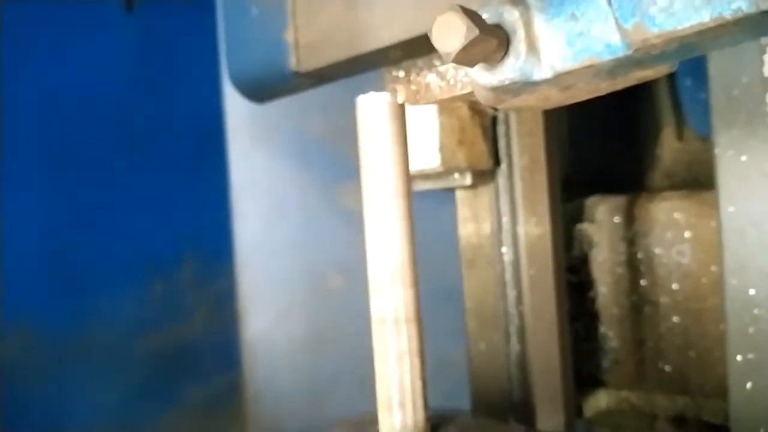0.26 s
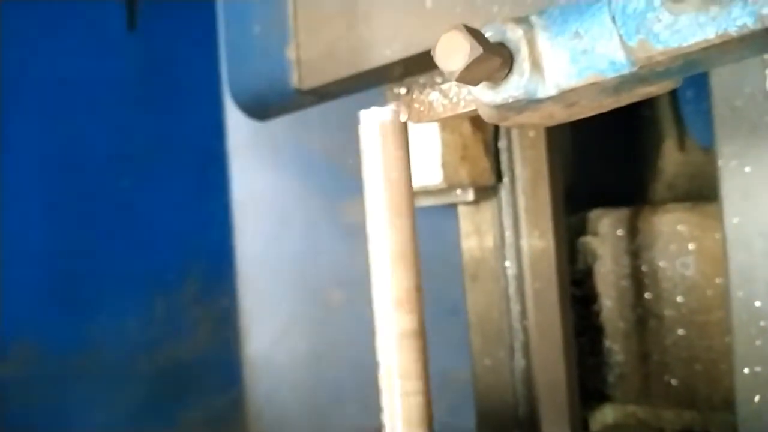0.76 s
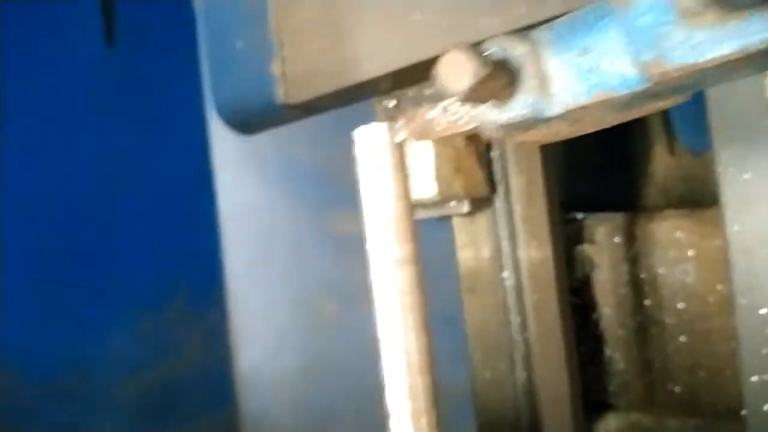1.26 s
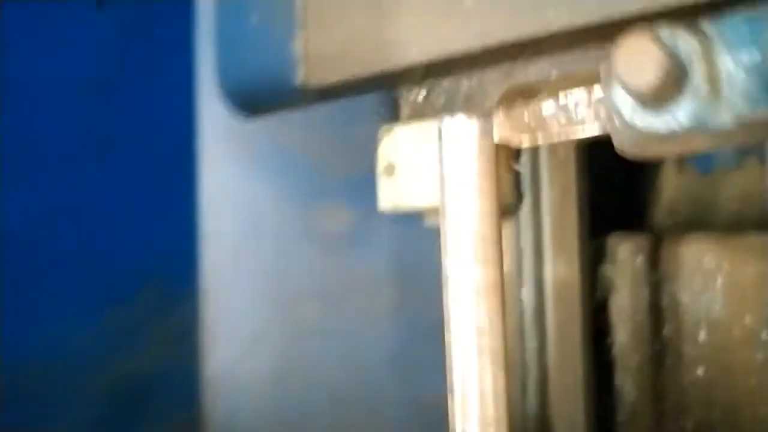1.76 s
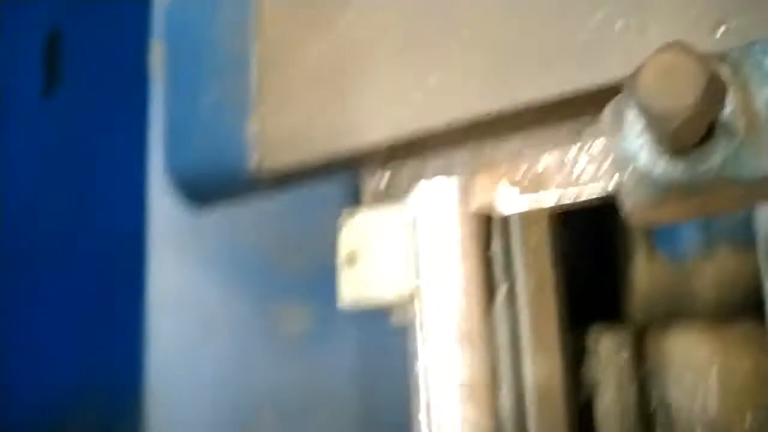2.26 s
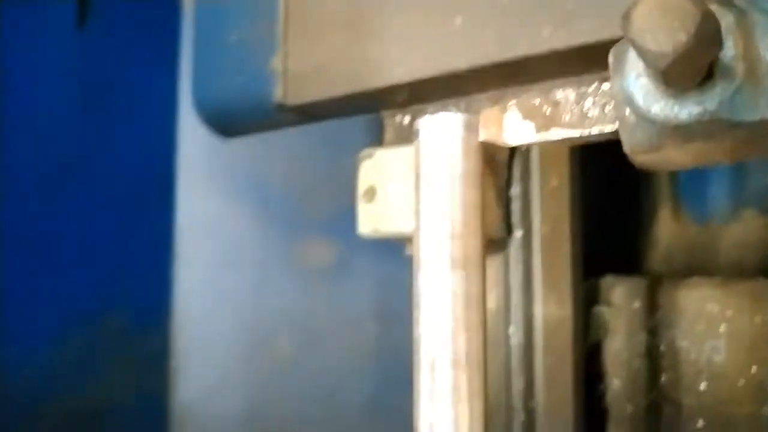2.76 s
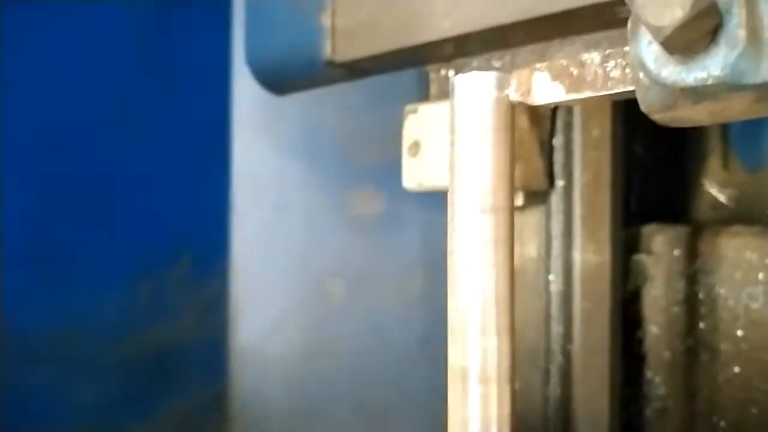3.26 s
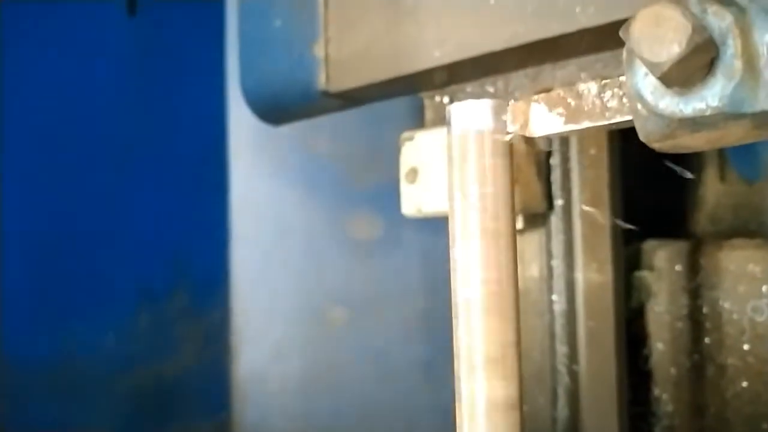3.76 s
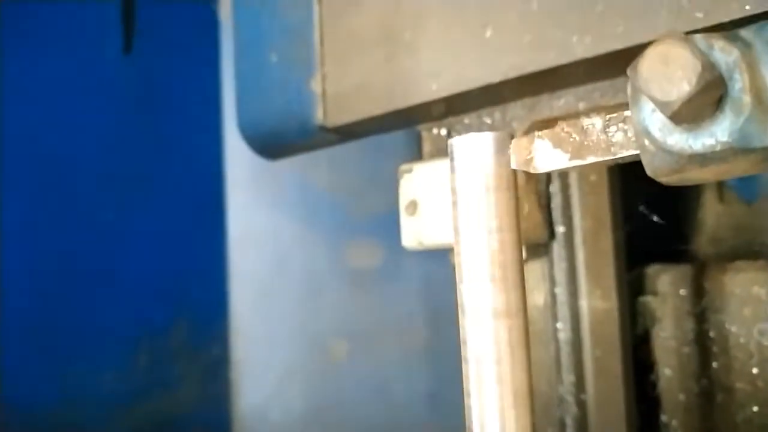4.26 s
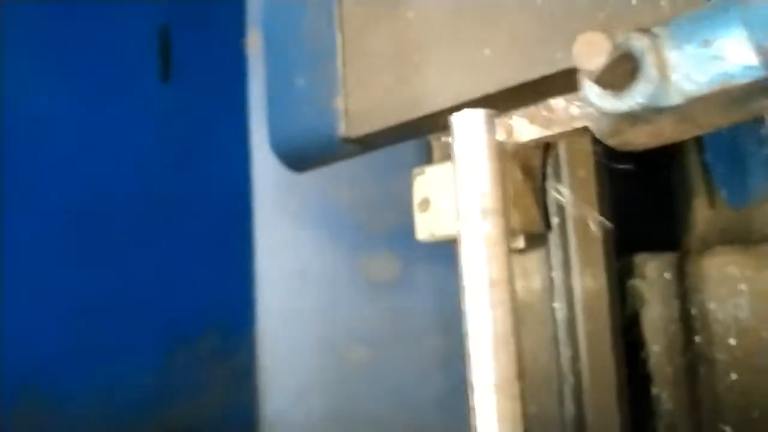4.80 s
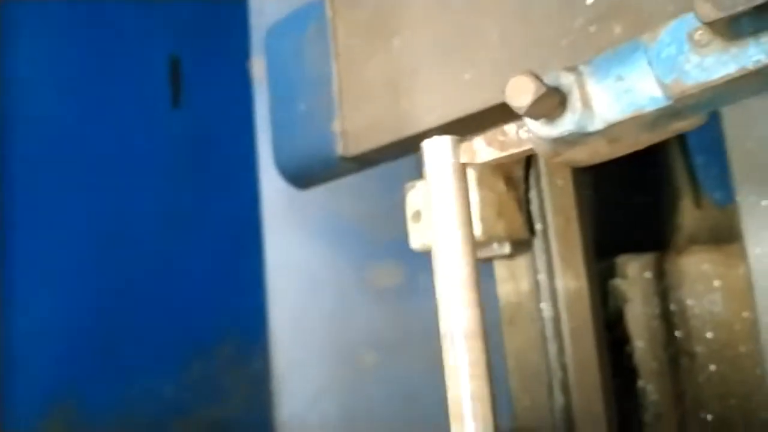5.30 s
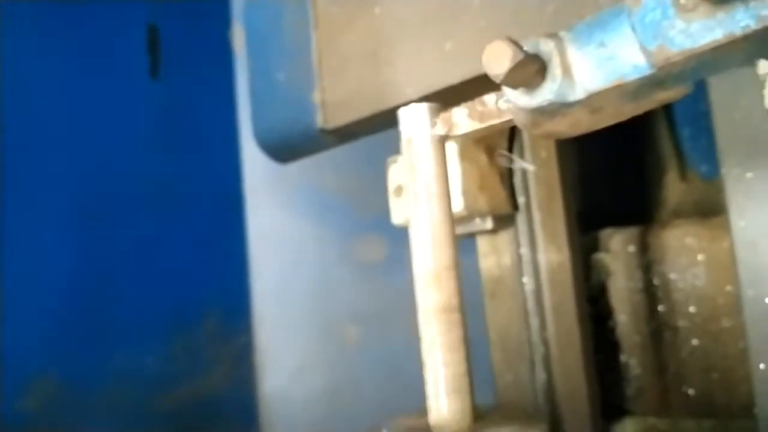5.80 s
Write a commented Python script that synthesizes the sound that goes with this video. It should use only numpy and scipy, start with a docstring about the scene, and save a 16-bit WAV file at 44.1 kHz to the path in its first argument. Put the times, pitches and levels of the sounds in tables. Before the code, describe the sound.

Close to a running lathe in a workshop, a steady motor rumble and gear hum sit beneath the fast, even ringing of a tool striking a turning metal rod. The cut deepens into a piercing, stuttering screech, harsh and slightly distorted at its peak. It then lightens to rhythmic chirps and scrapes, squeals again briefly, and carries on with the same bright, pulsing ring.

```python
"""A lathe tool squeals and rings against a slightly bent metal rod that turns about six times a second.
On light cuts it strikes only the high spots and rings in free decay. On deep cuts it sustains a
self-excited squeal, to which the rod's chatter adds side tones and rasp. Gears and motor hum beneath.
A hand-held two-port microphone hears it all; its limiter and clipping catch the peaks."""
import sys
import numpy as np
from scipy import signal
from scipy.fft import rfft, irfft, next_fast_len
from scipy.io import wavfile
from scipy.ndimage import uniform_filter1d, minimum_filter1d, map_coordinates

SR = 44100
rng = np.random.default_rng(int(sys.argv[2]) if len(sys.argv) > 2 else 0)


def dump(signal):
    """Clip the signal to [-1, 1] and save it as 16-bit WAV at the path in sys.argv[1]."""
    limited = np.clip(np.atleast_2d(signal).T, -1, 1)
    pcm = np.round(limited * 32767).astype(np.int16)
    wavfile.write(sys.argv[1], SR, pcm)


N = 266364
MESH_HZ = 665  # rate at which the gears shake the cut

# Resonances of the tool. Each row: frequency in Hz, bandwidth in Hz, relative gain in dB.
TOOL_MODES = [(4630, 120, -1.5), (5490, 205, 12), (6128, 102, 9), (6107, 400, 12.5), (8400, 330, -15)]
# Light contact of tool and rod. Each row: time in seconds, scrape level in dB,
# left-right difference of the bites in dB, their roughness from 0 to 1.
CONTACT = [(0, -50.5, -0.5, 0.53), (1, -39.5, 2.5, 0.51), (2.8, -31, 6, 0.53), (3.5, -35.5, 9, 0.69),
           (4.3, -38, 9.5, 0.66), (4.6, -44.5, 6.5, 0.28), (5, -33, 3, 0.42), (5.4, -41.5, 2, 0.38),
           (6.04, -41, 2.5, 0.23)]


def squeal():
    """Self-excited oscillation: the tool sings at its own mode, and gear modulation adds sidebands."""
    # Each row: time in seconds, relative sideband level in dB, stutter depth in dB.
    meshing = [(1, -35.5, 1), (1.25, -23.5, 1), (1.5, -37.5, 4.5), (2.1, -31, 3.5), (2.2, -33, 1.5),
               (2.7, -35, 2), (4.93, -17.5, 7.5), (5.25, -15, 8)]
    mesh_db, stutter_db = curves(meshing)
    hz, gain = deep_turns()
    sing, mesh = tone(hz, 22, 200), tone(MESH_HZ, 30, 60)
    shake = tone(2060, 40, 120)  # phase of the rod's chatter
    stutter = amp(stutter_db * np.minimum(wobble(130), .6))
    carrier = stutter * flutter([[1.5], [3.5]]) * np.sin(sing)
    sidebands = amp(mesh_db + 3.5) * flutter(7.6) * (np.sin(sing - mesh) + 1.1 * np.sin(sing + mesh))
    skirt = amp(-26 + 1.4 * stutter_db + 4 * wobble(120)) * noise(modes(TOOL_MODES))
    return amp(2.5) * gain * (carrier + sidebands + skirt) + chatter(sing, shake)


def deep_turns():
    """Mode hopping: each turn enters on a high mode and drops to a low one. Gives pitch and gain."""
    # Each row: start, length and delay of the drop in seconds, low mode in Hz, relative levels in dB
    # at entry, after the drop and at the end, delay of a brief dip in seconds.
    turns = [(0.996, 0.15, .014, 5490, -23, -12, -16.5, 0.058),
             (1.154, 0.15, .018, 5485, -23.5, -11, -19, .113),
             (1.311, .15, .024, 5520, -18, -13.5, -14, 0.099),
             (1.469, 0.14, .016, 5507, -18, -11, -16, .085),
             (1.628, 0.15, .028, 5534, -25, -20, -14.5, 0.13),
             (1.784, .15, .04, 5474, -13.5, -14, -13.5, .068),
             (1.941, .15, .044, 5470, -9.5, -14, -17.5, .1),
             (2.098, 0.16, .041, 5460, -5.5, -4.5, -10, .088),
             (2.254, .156, .041, 5437, -9, -2.5, -13, .088), (2.412, 0.16, .041, 5433, -6, -5, -10.5, .088),
             (2.569, .15, .041, 5460, -5.5, -4, -16, 0.1), (4.94, 0.15, .006, 5353, -20, -13, -21.5, 0.071),
             (5.097, 0.15, .006, 5344, -20.5, -15, -23, .08)]
    high_hz, sag_hz_per_s, edge_s, catch_s = 6063, 2600, .0067, .013
    t, hz, gain = np.arange(N) / SR, np.full(N, float(high_hz)), np.zeros(N)
    ramp = lambda elapsed, rise: np.clip(elapsed / rise, 0, 1) ** 2
    for start, length, drop, low_hz, entry_db, catch_db, late_db, dip in turns:
        inside = (t >= start) & (t < start + length)
        age = t[inside] - start
        low_age = np.maximum(age - drop, 0)
        settle_hz = 199.7 * np.exp(-low_age / .018)  # the low mode comes in sharp
        lift_hz = 150.1 * np.exp((age - length) / .029)  # and rises again as the cut lifts
        hz[inside] = np.where(age < drop, high_hz - sag_hz_per_s * age, low_hz + settle_hz + lift_hz)
        entry = amp(entry_db) * ramp(age, 2 * edge_s) * ramp(drop + edge_s / 2 - age, edge_s)
        dip_db = 7 * np.exp(-((age - dip) / .0073) ** 2)
        held = amp(catch_db + (late_db - catch_db) * low_age / (length - drop) - dip_db)
        gain[inside] = entry + held * ramp(age - drop + edge_s, catch_s) * ramp(length - age, edge_s)
    return uniform_filter1d(hz, size=150), gain


def chatter(sing, shake):
    """Bending vibration: the rod chatters in bursts, rasps, and modulates the squeal into side tones."""
    # Each row: start in seconds, relative rod and rasp levels in dB, swell over the burst in dB.
    bursts = [(1.06, -44.5, -47.5, 6), (1.209, -41, -45, 11.5), (1.375, -37.5, -50, 5),
              (1.53, -32.5, -38, 18), (1.692, -31, -34.5, 12.5), (1.849, -26.5, -31, 6),
              (2.007, -25, -26.5, 4.5), (2.163, -27.5, -26.5, 6), (2.324, -26, -19.5, 2.5),
              (2.481, -25.5, -24, 0), (2.637, -27.5, -27, -4.5), (4.95, -48.5, -48, -3.5),
              (5.1, -45.5, -45.5, -4.5)]
    # Bending modes. Each row: frequency in Hz, bandwidth in Hz, relative gain in dB.
    rod_modes = [(1755, 75, -8), (2006, 40, 6.5), (2247, 29, 2), (3340, 150, -7), (4270, 120, -2.5)]
    # Each row: frequency in Hz, relative spectral density in dB.
    rasp_spectrum = [(150, -18.5), (500, -14), (1200, -15.5), (2700, -13.5), (3500, -8.5), (4300, -6.5),
                     (5200, -3), (6250, 10.5), (6900, -3.5), (7900, -2)]
    burst_s, beat_s = .0836, .0392
    t, envelopes = np.arange(N) / SR, np.zeros((3, N))
    for start, rod_db, rasp_db, swell_db in bursts:
        inside = (t > start) & (t < start + burst_s)
        age = t[inside] - start
        swell = swell_db * (age / burst_s - .5) - 2 * np.cos(2 * np.pi * age / beat_s)
        side_db = -23.5 + 1.46 * (rod_db + 30)  # side tones grow faster than the rod's motion
        envelopes[:, inside] = amp([side_db + swell, rod_db + swell, rasp_db + 1.6 * swell])
    side, rod, rasp = uniform_filter1d(envelopes, size=400)
    side = side * flutter(10.6) * (np.sin(sing + shake) + .12 * np.sin(sing - shake))
    rod = rod * (flutter(7) * np.sin(shake) + 1.07 * noise(modes(rod_modes)))
    rasp = rasp * amp(11.5 + 3.9 * wobble(350)) * noise(lambda hz: amp(along(rasp_spectrum, hz)))
    return side + rod + rasp


def bites():
    """Impact excitation: each high spot rings one damped mode of the tool and scrapes the others."""
    # Each row: time in seconds, relative level in dB, ring frequency in Hz.
    high_spots = [(0.0611, -9, 5620), (0.2198, -8, 5680), (0.2336, -17, 5750), (0.3786, -4.5, 5670),
                  (0.5415, -7.5, 5590), (0.6983, -11, 5730), (0.8515, -10.5, 5400), (1.0008, -8.5, 5530),
                  (1.155, -5.5, 5520), (1.3146, -11, 5670), (1.4743, -11.5, 6160), (1.6338, -11.5, 5860),
                  (1.7927, -11, 6210), (2.7372, -8, 6200), (2.8717, -19.5, 6310), (2.8936, -2, 6210),
                  (2.9737, -14.5, 5480), (3.0408, -8.5, 6220), (3.0537, -7.5, 5700), (3.1305, -7, 6300),
                  (3.201, -7, 5730), (3.2133, -11, 5670), (3.2874, -15, 6120), (3.3582, -7, 5580),
                  (3.372, -13.5, 5730), (3.4433, -11, 6150), (3.5142, -10, 5950), (3.5253, -6.5, 6210),
                  (3.603, -20, 6440), (3.6667, -9.5, 6220), (3.6836, -7.5, 5900), (3.7575, -18.5, 6400),
                  (3.8109, -15.5, 5940), (3.8235, -11, 6340), (3.8448, -10, 5200), (3.9703, -17.5, 6340),
                  (3.9832, -15, 6330), (4.0017, -7, 6250), (4.0738, -19, 6240), (4.138, -17, 6230),
                  (4.1583, -8, 6160), (4.235, -19.5, 6360), (4.3154, -7.5, 6290), (4.4729, -2, 5280),
                  (4.6252, -19.5, 5730), (4.6354, -9, 5464), (4.7646, -19, 5590), (4.7905, -6.5, 5294),
                  (4.876, -13, 5290), (4.9107, -9.5, 5400), (5.2559, -7, 5480), (5.3923, -17.5, 5550),
                  (5.4148, -4.5, 5375), (5.547, -20.5, 5500), (5.573, -5, 5280), (5.7016, -16, 5450),
                  (5.7304, -5.5, 5380), (5.8674, -20.5, 5680), (5.8894, -6, 5536), (5.9745, -21.5, 5320),
                  (6.0193, -22.5, 5470)]
    # Subharmonics, as the edge skips every other swing.
    # Each row: start in seconds, relative level in dB, frequency in Hz.
    skips = [(4.954, -24.5, 2735), (5.1056, -20.5, 2715), (5.26, -30, 2630)]
    ring, scrape, t = np.zeros((2, N + SR)), np.zeros(N + SR), np.arange(SR // 8) / SR
    span = lambda start: round(start * SR) + np.arange(len(t))
    ring_t60_s, chip_t60_s = .046, .022
    decay = amp(-60 * t / ring_t60_s)
    for time, db, hz in high_spots:
        at = span(time - .0025)
        envelope = amp(db + 14) * decay * (1 - np.exp(-t / .0042)) ** 2  # swells over a few milliseconds
        phase = 2 * np.pi * hz * (t + .00044 * (1 - np.exp(-t / .009)))  # settles as the edge frees
        ring[:, at] += envelope * np.sin(phase + rng.uniform(0, 2 * np.pi, (2, 1)))
        ring[:, at] += amp(db - 14 - 60 * t / chip_t60_s) * rng.standard_normal((2, len(t)))  # chip snaps
        scrape[at] += envelope
    for start, db, hz in skips:
        ring[:, span(start)] += amp(db + 3) * decay * (1 - np.exp(-t / .001)) * np.sin(2 * np.pi * hz * t)
    _, pan_db, rough = curves(CONTACT)
    flicker = amp(10 * rough * np.minimum(wobble(300), .5))
    gear_shake = 1 + .82 * (1 - rough) * np.sin(tone(MESH_HZ, 30, 60))
    grains = amp(-8 + 1.9 * np.minimum(wobble(250), .5)) * noise(lambda hz: modes(TOOL_MODES)(hz) ** 2)
    pan = amp(np.outer([.5, -.5], pan_db))
    return pan * ((1 - rough) * flicker * gear_shake * ring[:, :N] + rough * grains * scrape[:N])


def light_scrape():
    """Friction noise: light contact with the rod faintly excites the tool's modes."""
    return amp(curves(CONTACT)[0] + 5.1 * wobble(45)) * noise(modes(TOOL_MODES))


def motor_and_gears():
    """Forced vibration: the motor rumbles, the gears hum and whine, and periodic tooth load throbs."""
    # Each row: time in seconds, relative levels of rumble, gears and whine in dB.
    levels = [(0.0, -40, -40, -53.5), (0.74, -41, -42, -54), (1.51, -42, -49.5, -58.5),
              (2.2, -41, -49.5, -49), (4.12, -39.5, -36, -53.5), (5.2, -40.5, -47.5, -55),
              (6.04, -40.5, -40, -53.5)]
    # Each row: frequency in Hz, relative spectral density in dB.
    rumble_spectrum = [(12, -58), (20, -12), (168, -9.5), (258, -4.5), (508, -11), (703, -3.5),
                       (926, -13.5), (1080, -13), (1220, -14), (3410, -20.5), (4730, -18), (5630, -13.5),
                       (8000, -25), (10400, -66), (17600, -120)]
    # Each row: frequency in Hz, bandwidth in Hz, relative gain in dB.
    gear_modes = [(259.3, 10.8, -9), (365, 6.7, -11.5), (711, 18.7, -6.5), (802, 6.3, -10),
                  (1079.4, 8.2, -10.5), (1636, 30, -9), (2080, 103, -9.5)]
    turn_s, load_peak_s = .1574, 3.995
    rumble_db, gear_db, whine_db = curves(levels)
    rumble = amp(rumble_db + 3 + .7 * wobble(6)) * noise(lambda hz: amp(along(rumble_spectrum, hz)))
    hum = amp(gear_db + 1.5 + 1.81 * wobble(12)) * noise(modes(gear_modes[:5]))
    load = 4 * np.pi * (np.arange(N) / SR - load_peak_s) / turn_s  # the teeth load up twice a turn
    throb_gain = amp(gear_db + 7.6 * np.cos(load) + 3.8 * wobble(8))
    throb = throb_gain * np.sin(tone(712 - 18 * np.sin(load), 8.1, 18))  # the pitch sags under load
    whine = amp(whine_db + 9.5 + 1.3 * wobble(22)) * noise(modes(gear_modes[5:]))
    return rumble + hum + throb + whine


def walls(x, t60_s):
    """Reverberation: reflections from machine bed and walls decay exponentially, unlike at each port."""
    t = np.arange(SR // 3) / SR
    tail = rng.standard_normal((2, len(t))) * amp(-60 * t / t60_s)
    return signal.fftconvolve(x, tail / np.linalg.norm(tail[0]), axes=1)[:, :N]


def ports(x, lag_s):
    """Level and time differences: the left port is louder at most frequencies, but later."""
    # Each row: frequency in Hz, left-right difference in dB.
    balance = [(25, -2.5), (250, 2.5), (700, -0.2), (1200, 6), (5000, 1), (5550, 5.5), (6050, 5), (7600, 3)]
    half = np.array([[.5], [-.5]])
    return filtered(x, lambda hz: amp(half * along(balance, hz)) * np.exp(-2j * np.pi * hz * half * lag_s))


def noise(response):
    """Partial coherence: coloured stereo noise of rms 1, partly alike at both ports."""
    # Each row: frequency in Hz, left-right correlation from 0 to 1.
    coherence = [(25, 1), (60, 0.3), (150, 1), (300, 0.8), (700, 0.43), (2000, 0.15), (8000, 0.16)]
    angle = lambda hz: np.arccos(np.clip(along(coherence, hz), -1, 1)) / 2
    white = rng.standard_normal((2, N))
    mid, side = filtered(white, lambda hz: response(hz) * [np.cos(angle(hz)), np.sin(angle(hz))])
    stereo = np.array([mid + side, mid - side])
    return stereo / np.sqrt(np.mean(stereo ** 2) + 1e-20)


def modes(table):
    """Modal superposition: the response of damped resonators summed with alternating signs."""
    return lambda f: sum((-1) ** k * amp(db) * 1j * f * width / (hz * hz - f * f + 1j * f * width)
                         for k, (hz, width, db) in enumerate(table))


def flutter(depth_db):
    """Random amplitude modulation: each port hears different beats."""
    return amp(depth_db * np.minimum([wobble(110), wobble(110)], .8))


def tone(hz, waver_hz, rate):
    """Frequency modulation: the phase of a tone whose pitch wavers at random."""
    return 2 * np.pi * np.cumsum(hz + waver_hz * wobble(rate)) / SR


def wobble(rate):
    """Slow noise: a spline through random knots, rate of them a second."""
    return map_coordinates(rng.standard_normal(int(N * rate / SR) + 4), [np.arange(N) * rate / SR])


def filtered(x, response):
    """Linear filtering: the spectrum of x times a complex frequency response."""
    size = next_fast_len(N + SR // 2)
    return irfft(rfft(x, size) * response(np.fft.rfftfreq(size, 1 / SR)), size)[..., :N]


def curves(rows):
    """Linear interpolation in time: one value per sample for each column after the first."""
    times, *columns = np.transpose(rows)
    return [np.interp(np.arange(N) / SR, times, column) for column in columns]


def along(points, hz):
    """Interpolation of (Hz, value) points on a logarithmic frequency axis."""
    knots_hz, values = np.transpose(points)
    return np.interp(np.log(hz + 1), np.log(knots_hz + 1), values)


def amp(db):
    """Amplitude ratio of a level in decibels."""
    return 10 ** (np.asarray(db) / 20)


def scene():
    """Superposition: the cut and its reflections sound over the running machine."""
    cut = bites() + ports(squeal(), lag_s=.00022)
    room = amp(-15) * walls(cut, t60_s=.08)
    return cut + room + ports(motor_and_gears() + light_scrape(), lag_s=.00018)


def record(dry):
    """Saturation: a fast limiter reins in the loudest peaks, which then clip softly and add overtones."""
    capsule_hz, top_hz = 7950, 15676
    x = filtered(dry, lambda hz: 1 / (1 + (hz / capsule_hz) ** 120))
    needed_gain = np.minimum(1, 1.2 / (np.abs(x) + 1e-9))
    x = x * uniform_filter1d(minimum_filter1d(needed_gain, size=90), size=60)
    x = x / (1 + np.abs(x / .99) ** 6) ** (1 / 6)  # soft clipping
    return filtered(x, lambda hz: hz < top_hz)


dry = scene()
out = record(dry)
dump(out)
```